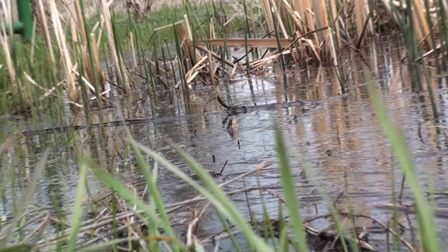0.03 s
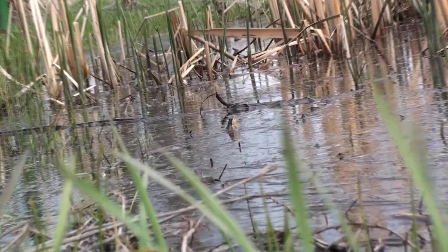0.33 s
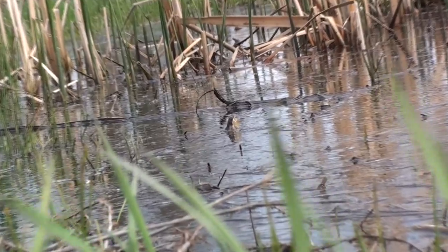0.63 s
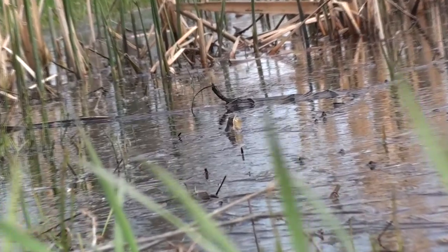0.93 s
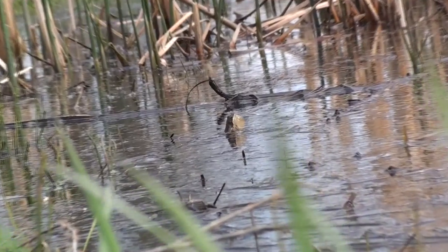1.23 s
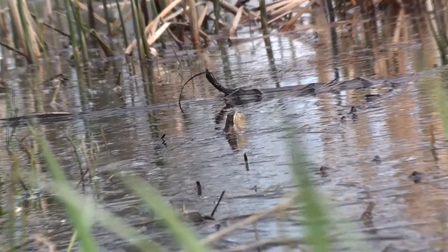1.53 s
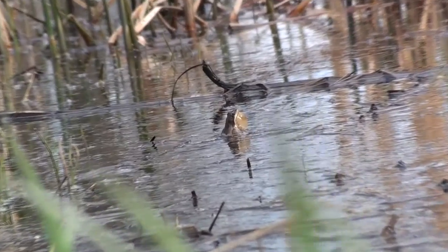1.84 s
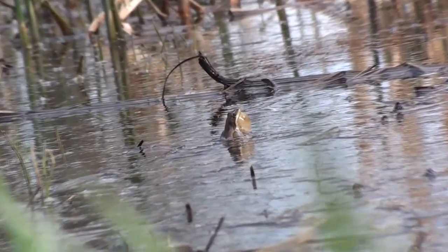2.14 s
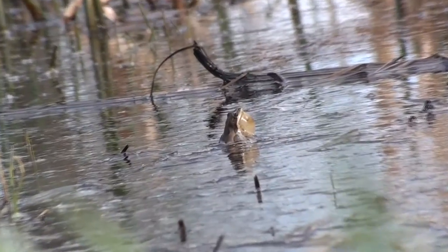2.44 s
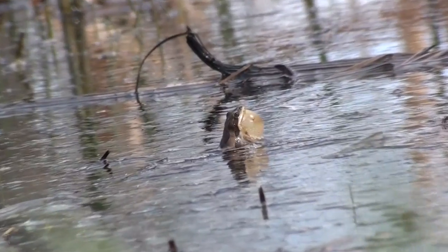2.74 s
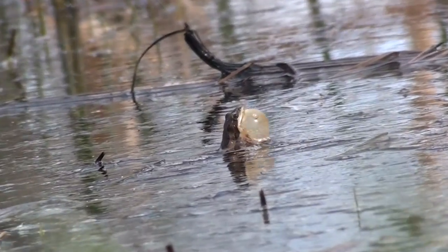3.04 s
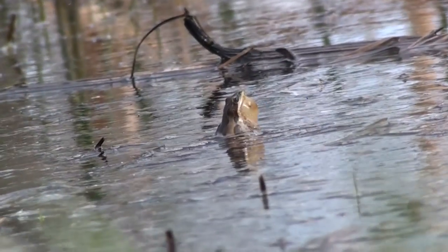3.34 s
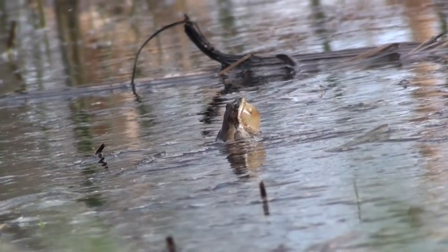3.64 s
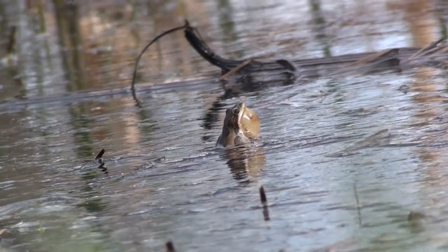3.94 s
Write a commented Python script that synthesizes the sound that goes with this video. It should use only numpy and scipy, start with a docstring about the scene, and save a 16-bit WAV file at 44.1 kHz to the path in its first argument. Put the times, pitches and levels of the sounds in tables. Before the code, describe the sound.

Chorus frogs creak in a marshy pond from just after the start. From about 0.2 seconds, a few close frogs trade high trills, each a run of pulses under half a second long that slows, swells and rises slightly. A farther crowd calls steadily, mostly to the right. Light wind bumps the microphone, hardest near 1.7 seconds. The calling continues to the end, at about 4 seconds.

```python
"""After a blink of silence, a marshy pond cuts in: a crowd of chorus frogs, mostly to the right, over a
distant band of more. From 0.17 s a few near males trade creaks, each a train of short 3 kHz vocal pulses
that slows, swells and rises; reeds scatter the pulses. Light wind bumps the microphone, hardest near
1.7 s. The frogs call on to the end, while a quick limiter ducks the loudest pulses."""
import sys
import numpy as np
from scipy import signal
from scipy.fft import rfft, irfft
from scipy.io import wavfile
from scipy.ndimage import uniform_filter1d, minimum_filter1d

SR = 44100
rng = np.random.default_rng(int(sys.argv[2]) if len(sys.argv) > 2 else 0)


def bounce(signal):
    """Save signal as a 16-bit WAV file at the path given by the first command-line argument."""
    frames = np.transpose(np.atleast_2d(signal))
    limited = np.clip(frames, -1, 1)
    pcm = np.round(limited * 32767).astype(np.int16)
    wavfile.write(sys.argv[1], SR, pcm)


N = 176400

# cue list of the near frogs: frog, t/s, length/s, first, middle and last pulse gap/s
NEAR_CALLS = [ ("bright", .169, .464, .0221, .0364, .0422), ("rival", .209, .389, .0205, .0352, .0452),
              ("right", .6413, .468, .0234, .0438, .0568), ("deep", 1.067, .416, .0251, .0336, .0337),
              ("farther", 1.3564, .344, .029, .0428, .034), ("bright", 1.763, .398, .0223, .0356, .0444),
              ("rival", 1.7755, .383, .0226, .0379, .0471), ("right", 2.2226, .495, .0219, .0428, .0594),
              ("deep", 2.707, .41, .0245, .0328, .035), ("farther", 2.861, .35, .03, .039, .039),
              ("bright", 3.2427, .399, .0231, .0355, .0419), ("rival", 3.333, .372, .022, .0371, .044),
              ("right", 3.702, .302, .022, .03, .0428)]
# voice of each near frog: f/Hz, level/dB, left minus right/dB, overtones/dB, treble tilt/(dB per octave)
VOICES = { "bright": (3083, -10, 1.5, 1.5, -5), "rival": (3092.5, -5, -2, -3, -7.5),
          "deep": (2710, -3.5, 2, -4.5, -6), "right": (3001, -8.5, -1.5, 2, -26.5),
          "farther": (2967, -16.5, 5, 3.5, -12.5)}
# high ring of each near frog: f/Hz, climb/share per call, level/dB
HIGH_RINGS = {"bright": (7750, .03, -30), "rival": (10350, .05, -33), "deep": (9250, .08, -27),
              "right": (6030, .06, -21), "farther": (11000, .05, -41)}
# partials of a pulse, at 1, 2, 3... times half the pitch: level/dB, decay/s
PULSE_PARTIALS = [(-12, 0.0011), (-1, .0022), (-12.5, 0.0016), (-18, 0.0011), (-34.5, 0.002)]
# tone colour of the scrape that starts each pulse: f/Hz, level/dB
RASP_SPECTRUM = [(400, -30), (900, -16), (1200, -1), (2000, -6), (4500, 0), (6500, -7), (9000, -7),
                 (11000, -10), (12500, -17), (14000, -19), (16000, -28)]
# tone colour of the distant chorus and air: f/Hz, level/dB
FAR_SPECTRUM = [(30, -25), (70, -12.5), (200, -21.5), (450, -26.5), (900, -30.5), (1150, -22.5),
                (1500, -16), (2050, -26.5), (2500, -10), (3000, -0.5), (3300, -5.5), (3650, -29.5),
                (4500, -21), (5400, -33.5), (6100, -33.5), (7000, -56), (10000, -47.5), (15500, -60)]
# wind puffs: t/s, half width/s, level/dB
PUFFS = [(.3, 0.062, -35.5), (.58, 0.019, -31.5), (.77, 0.02, -30.5), (.82, 0.0083, -23),
         (1.05, 0.29, -40.5), (1.27, 0.064, -37.5), (1.57, .025, -31.5), (1.648, 0.024, -29),
         (1.737, 0.026, -19), (1.818, 0.024, -26), (2.353, 0.034, -24), (2.46, 0.03, -27.5),
         (2.808, 0.013, -26), (2.99, 0.079, -39), (3.236, 0.024, -29), (3.75, 0.13, -45.5)]
# tone colour of wind on the microphone: f/Hz, level/dB
WIND_SPECTRUM = [(20, -21), (45, -2.5), (75, 0), (125, 0), (220, -10.5), (350, -22.5), (700, -49),
                 (2000, -63.5)]

START_DB, FULL_AT, END_DB = -10, .42, -1  # swell of a call; FULL_AT is a share of its length
PITCH_CLIMB, PITCH_JITTER, CHIRP = .06, .015, .02  # shares: rise per call, scatter, drop within a pulse
RISE_S, RISE_SHAPE, RING_S, PULSE_SPREAD_DB = .0011, 2.06, .0012, 1
RASP_DB, RASP_S, TREBLE_HZ = -21, .002, 5300  # air dulls the scrape above TREBLE_HZ
CROWD_DB, CROWD_SPREAD_DB, CROWD_HZ, CROWD_SPREAD_HZ = -18.5, 3, 2950, 105
CROWD_PAN_DB, CROWD_PAN_SPREAD_DB, CROWD_OVERTONES_DB, CROWD_TILT_DB = -8.2, 1.5, -10, -19
CROWD_LENGTH_S, CROWD_GAPS_S = .45, (.022, .037, .047)
REEDS_NEAR_DB, REEDS_CROWD_DB, REEDS_WIDTH = -9, -6, .53  # reverb sends; side against mid
REEDS_T60_S, POND_T60_S, POND_DB = .034, .91, -16
FAR_DB, FAR_PAN_DB = -23.5, -3
LIMIT_DB, DUCK_DB_PER_DB, RECOVER_DB_PER_S = -2.5, 3.417, 498
START_S, HIGH_CUT_HZ = .116, 15850


def near_frogs():
    """The lead voices: the closest males answer one another."""
    out = np.zeros((2, N))
    for frog, start, length, *gaps in NEAR_CALLS:
        for s, sound in creak(start, length, gaps, *VOICES[frog], *HIGH_RINGS[frog]):
            add(out, s, sound)
    return out


def creak(start, length, gaps, hz, db, pan_db, overtones_db, tilt_db, ring_hz, ring_climb, ring_db):
    """One call, as timed pulses that spread out while they swell and climb in pitch."""
    count, size = 24, 640  # most pulses per call, samples per pulse
    jitters = rng.standard_normal((count, 2))
    phases = rng.random((count, len(PULSE_PARTIALS)))
    colour = [(f, level + tilt_db * max(np.log2(f / TREBLE_HZ), 0)) for f, level in RASP_SPECTRUM]
    rasps = noise(colour, count * size).reshape(count, size)
    s = 0
    for (loud, sharp), phase, rasp in zip(jitters, phases, rasps):
        progress = s / length
        if progress > 1:
            break
        swell_db = np.interp(progress, [0, FULL_AT, 1], [START_DB, 0, END_DB])
        gain = amp(db + swell_db + PULSE_SPREAD_DB * loud)
        pitch = hz * (1 + PITCH_CLIMB * (progress - .5) + PITCH_JITTER * sharp)
        ring = ring_hz * (1 + ring_climb * (progress - .5))
        yield start + s, panned(gain * pulse(pitch, overtones_db, ring, ring_db, rasp, phase), pan_db)
        s += np.interp(progress, [0, .5, 1], gaps)


def pulse(hz, overtones_db, ring_hz, ring_db, rasp, phases):
    """One snap of the vocal folds: a scrape, then the throat sac rings for a few milliseconds."""
    t = np.arange(len(rasp)) / SR
    attack = 1 - np.exp(-(t / RISE_S) ** RISE_SHAPE)
    glide = 1 + CHIRP * (np.exp(-t / RISE_S / 2) - .5)
    cycles = hz / 2 * np.cumsum(glide) / SR
    body = 0
    for k, ((db, decay), phase) in enumerate(zip(PULSE_PARTIALS, phases), 1):
        envelope = amp(db + overtones_db * (k > 2)) * np.exp(-t / decay)
        body += envelope * np.sin(2 * np.pi * (k * cycles + phase))
    ring = amp(ring_db) * np.exp(-t / RING_S) * np.sin(2 * np.pi * ring_hz * t)
    scrape = amp(RASP_DB + overtones_db) * np.exp(-t / RASP_S) * rasp
    return 2 * attack * (body + ring + scrape)


def crowd(count=60):
    """The middle ground: farther frogs call without pause, each at its own pitch, pace and place."""
    out = np.zeros((2, N))
    slots = (np.arange(count) + rng.random(count)) / count
    starts = slots * (N / SR + CROWD_LENGTH_S) - CROWD_LENGTH_S
    traits = rng.uniform(-1, 1, (count, 4)) * np.sqrt(np.pi)
    for start, (slow, sharp, loud, side) in zip(starts, traits):
        gaps = np.array(CROWD_GAPS_S) * np.exp(.08 * slow)
        hz = CROWD_HZ + CROWD_SPREAD_HZ * sharp
        pan_db = CROWD_PAN_DB - CROWD_PAN_SPREAD_DB * side
        for s, sound in creak(start, CROWD_LENGTH_S, gaps, hz, CROWD_SPREAD_DB * loud, pan_db,
                              CROWD_OVERTONES_DB, CROWD_TILT_DB,
                              ring_hz=4600, ring_climb=.12, ring_db=-34):
            add(out, s, sound)
    return amp(CROWD_DB) * unit(out)


def reeds(send):
    """The space: quick scatter from the stems, then a faint tail over the pond."""
    t = np.arange(SR // 2) / SR
    mid, side = rng.standard_normal((2, len(t))) * (rng.random((2, len(t))) < .06) * (t > .001)
    echoes = np.array([mid + REEDS_WIDTH * side, mid - REEDS_WIDTH * side])
    echoes *= amp(-60 * t / REEDS_T60_S) + amp(POND_DB - 60 * t / POND_T60_S)
    echoes /= np.linalg.norm(echoes, axis=1, keepdims=True)
    return signal.fftconvolve(send, echoes, axes=1)[:, :N]


def far_chorus():
    """The bed: the most distant frogs blur into a steady band over faint air noise."""
    return amp(FAR_DB) * panned(noise_pair(FAR_SPECTRUM, likeness=.9), FAR_PAN_DB)


def wind():
    """Short puffs rumble on the microphone."""
    t = np.arange(N) / SR
    power = sum(amp(db) ** 2 * np.exp(-((t - s) / width) ** 2) for s, width, db in PUFFS)
    return np.sqrt(power) * noise_pair(WIND_SPECTRUM, likeness=.58)


def noise(spectrum, size):
    """Noise of rms 1 with the given tone colour."""
    hz, db = np.transpose(spectrum)
    shape = amp(np.interp(np.log(np.fft.rfftfreq(size, 1 / SR) + 1), np.log(hz), db))
    return unit(irfft(rfft(rng.standard_normal(size)) * shape, size))


def noise_pair(spectrum, likeness):
    """Stereo noise: wide at likeness 0, mono at 1."""
    left, other = noise(spectrum, N), noise(spectrum, N)
    return np.array([left, likeness * left + np.sqrt(1 - likeness ** 2) * other])


def amp(db):
    """Decibels to gain."""
    return 10 ** (np.asarray(db) / 20)


def unit(x):
    """Scales to rms 1."""
    return x / np.sqrt(np.mean(x ** 2) + 1e-20)


def panned(x, pan_db):
    """Pans a sound; positive is left."""
    gains = amp([[pan_db / 2], [-pan_db / 2]])
    return x * gains / gains.mean()


def add(mix, s, sound):
    """Mixes a sound in at time s, dropping what falls outside."""
    at = int(round(s * SR))
    if 0 <= at < N:
        part = mix[:, at:at + sound.shape[1]]
        part += sound[:, :part.shape[1]]


def scene():
    """The mix: near frogs, the crowd, their echoes, the far chorus and wind."""
    near, others = near_frogs(), crowd()
    send = amp(REEDS_NEAR_DB) * near + amp(REEDS_CROWD_DB) * others
    return near + others + reeds(send) + far_chorus() + wind()


def record(dry):
    """The master chain: a limiter that ducks peaks below its threshold, a hard cut-in and a high cut."""
    t = np.arange(N) / SR
    peak_db = 20 * np.log10(abs(dry).max(0) + 1e-9)
    release_db = RECOVER_DB_PER_S * t
    envelope_db = np.maximum.accumulate(peak_db + release_db) - release_db
    over_db = np.maximum(envelope_db - LIMIT_DB, 0)
    held_db = -minimum_filter1d(-over_db, size=61)  # brief look-ahead and hold
    duck_db = DUCK_DB_PER_DB * uniform_filter1d(held_db, size=61)
    limited = dry * amp(-duck_db) * (t >= START_S)
    high_cut = signal.firwin(511, HIGH_CUT_HZ, window=("kaiser", 9), fs=SR)
    return signal.oaconvolve(limited, high_cut[None], "same")


dry = scene()
out = record(dry)
bounce(out)
```